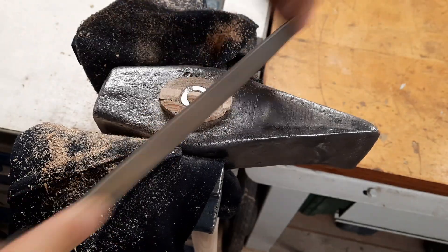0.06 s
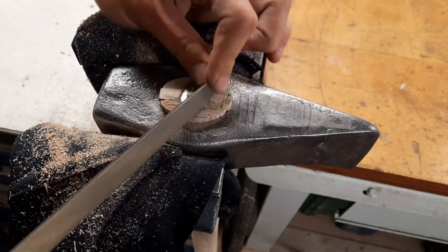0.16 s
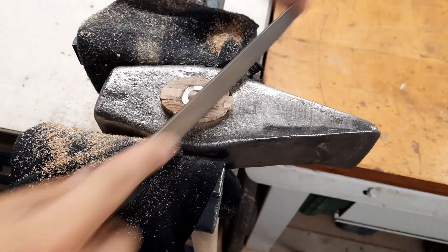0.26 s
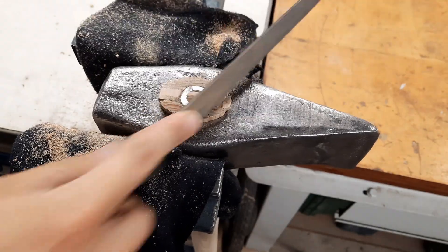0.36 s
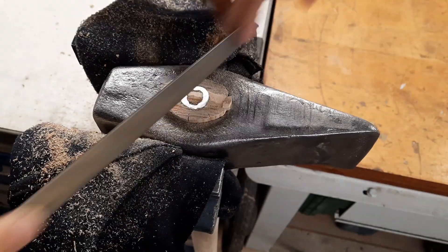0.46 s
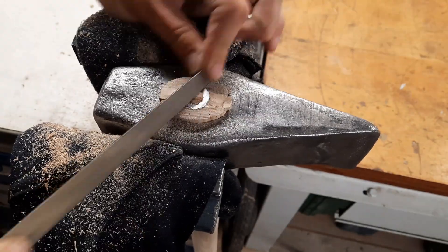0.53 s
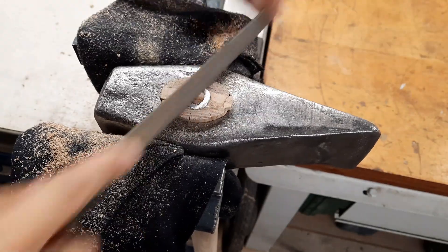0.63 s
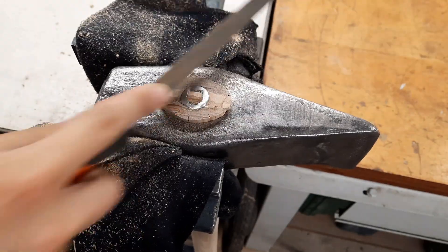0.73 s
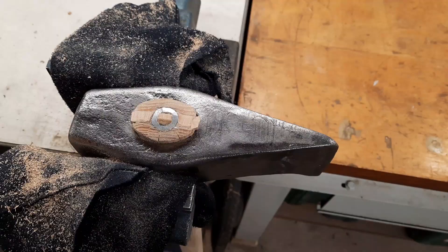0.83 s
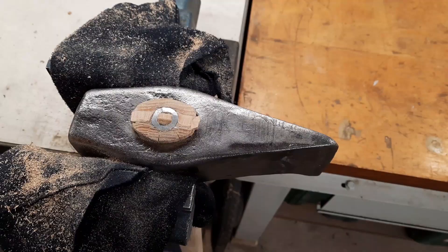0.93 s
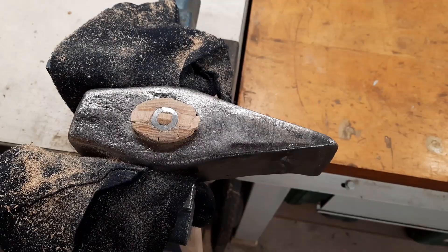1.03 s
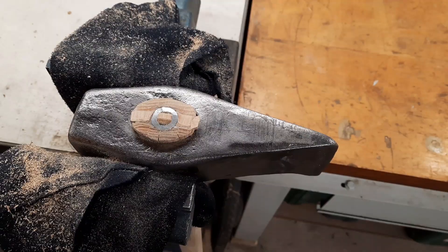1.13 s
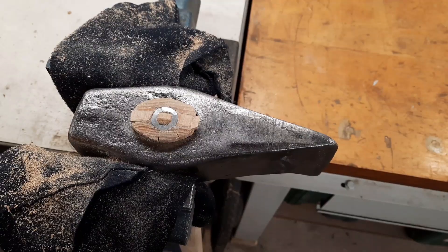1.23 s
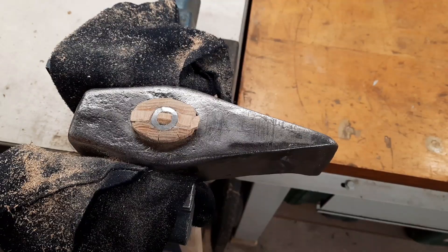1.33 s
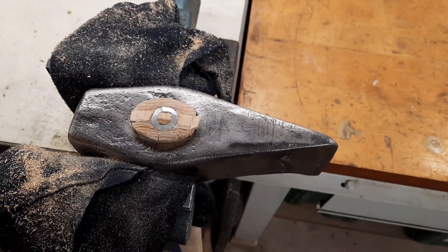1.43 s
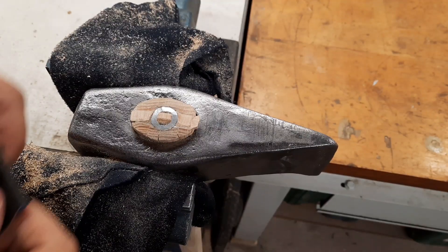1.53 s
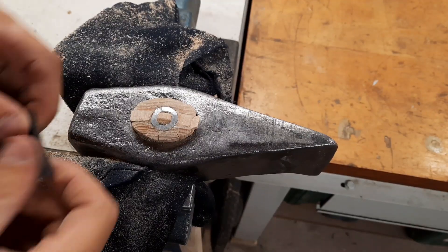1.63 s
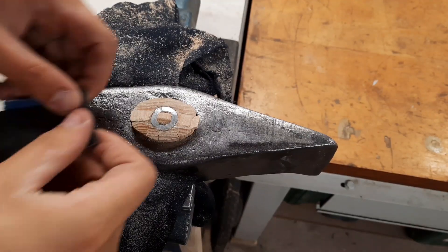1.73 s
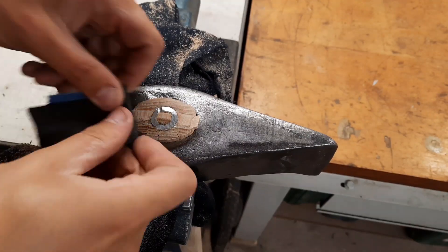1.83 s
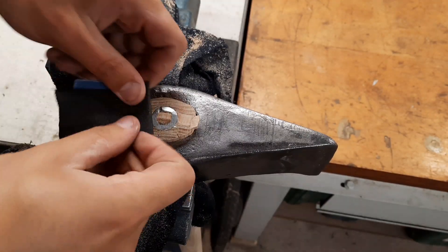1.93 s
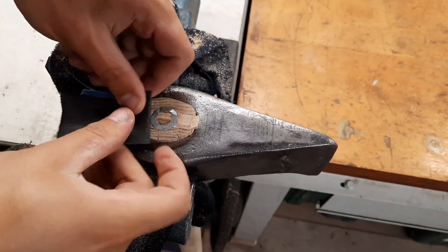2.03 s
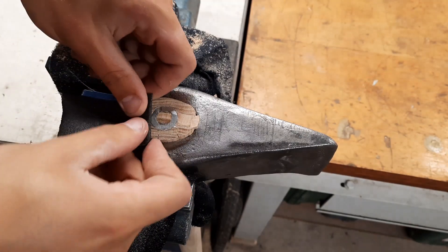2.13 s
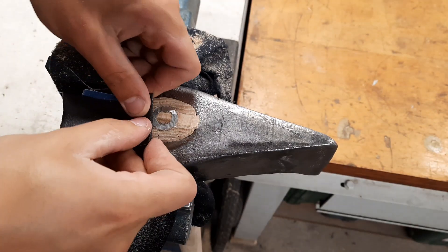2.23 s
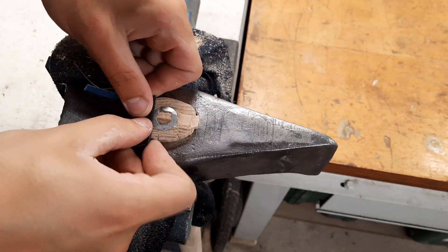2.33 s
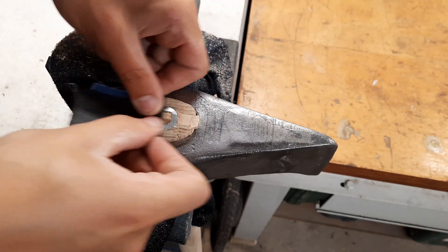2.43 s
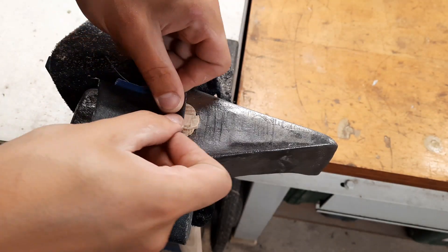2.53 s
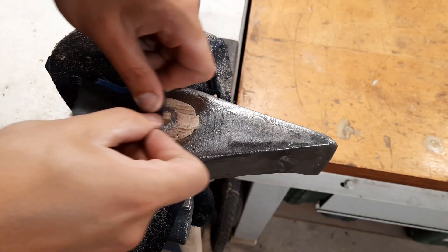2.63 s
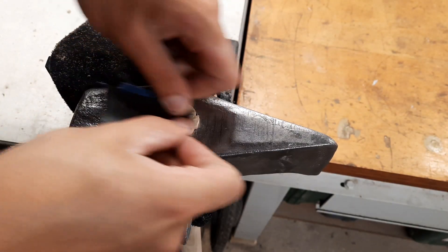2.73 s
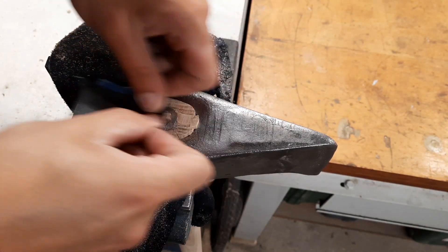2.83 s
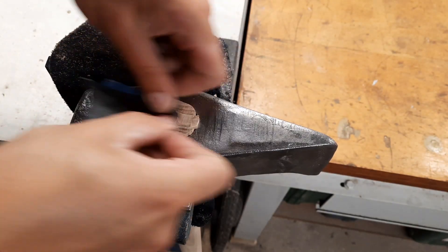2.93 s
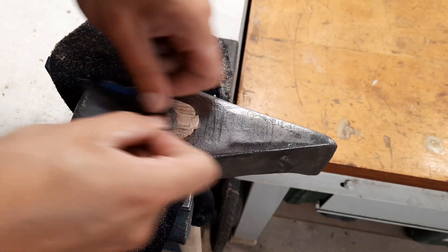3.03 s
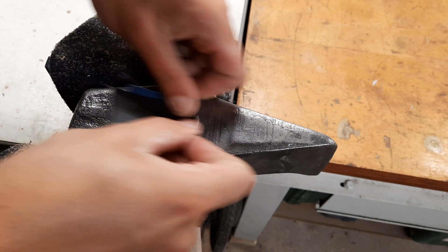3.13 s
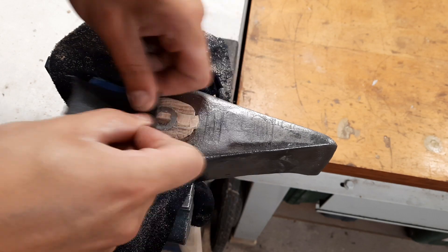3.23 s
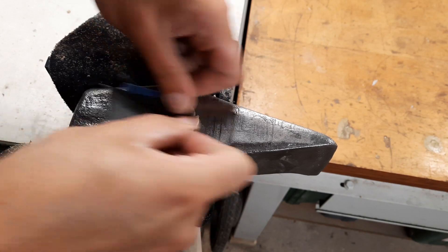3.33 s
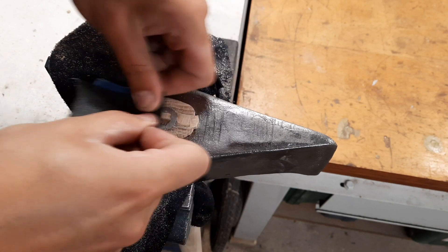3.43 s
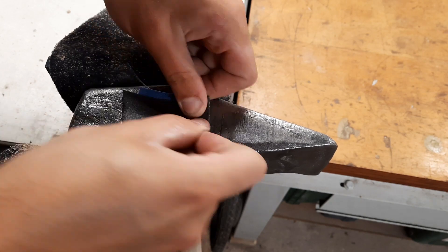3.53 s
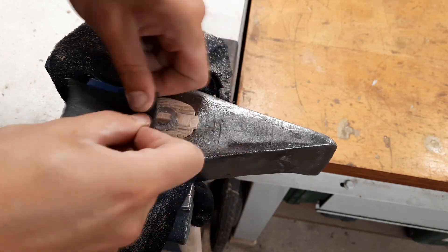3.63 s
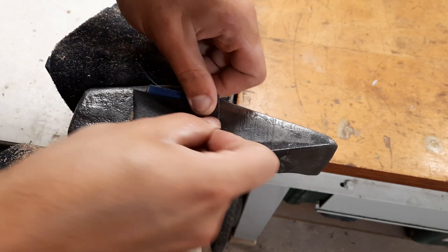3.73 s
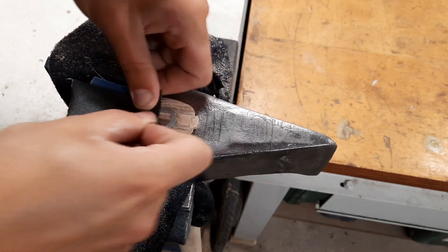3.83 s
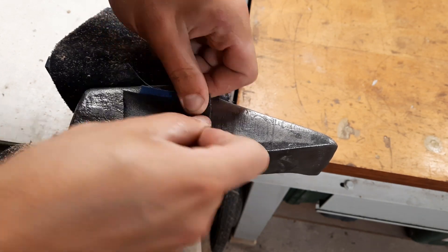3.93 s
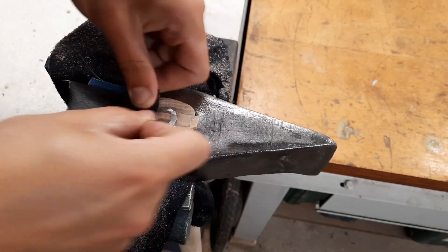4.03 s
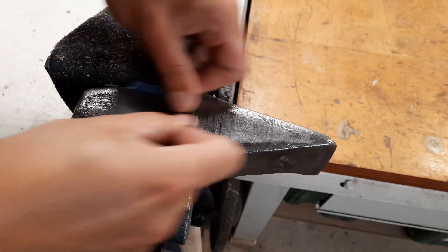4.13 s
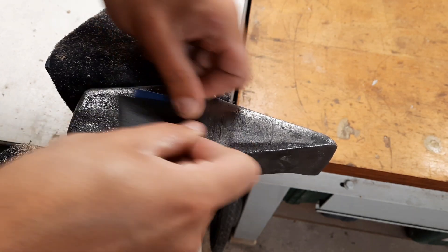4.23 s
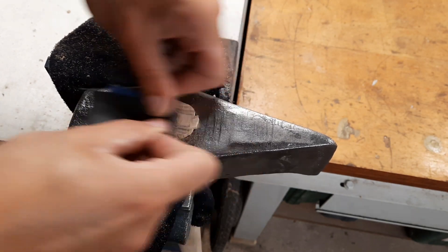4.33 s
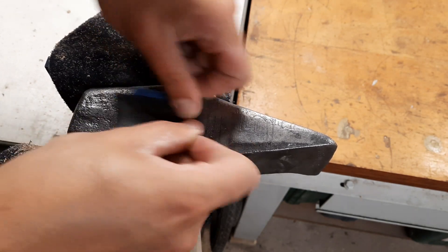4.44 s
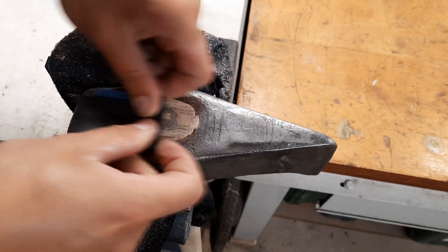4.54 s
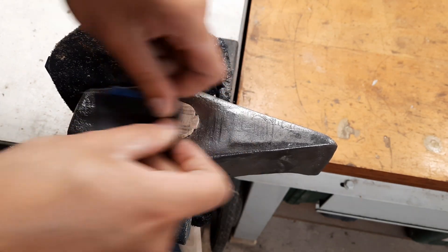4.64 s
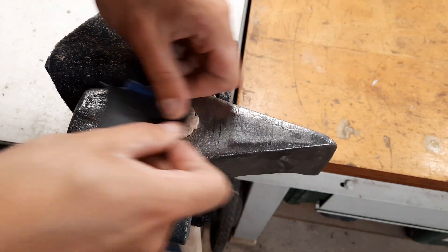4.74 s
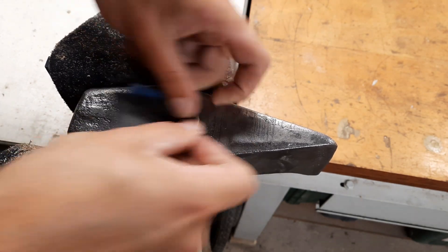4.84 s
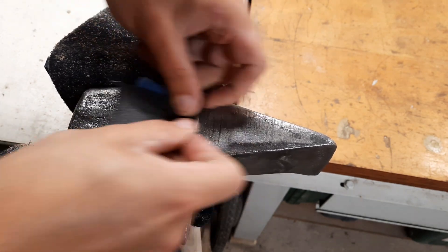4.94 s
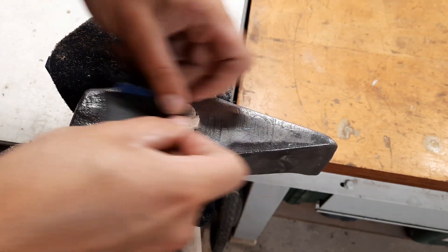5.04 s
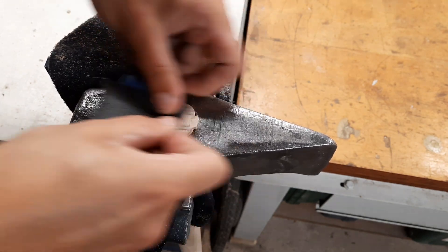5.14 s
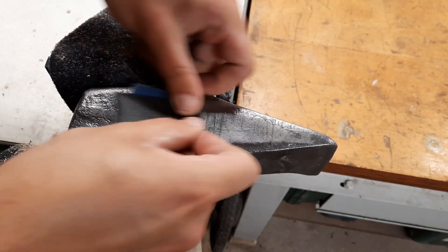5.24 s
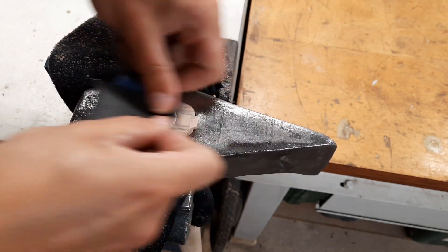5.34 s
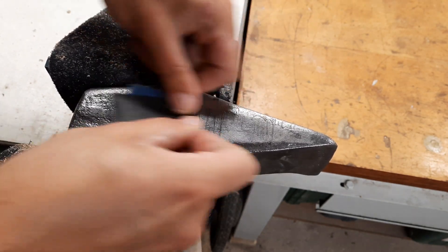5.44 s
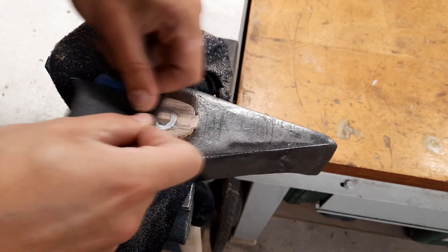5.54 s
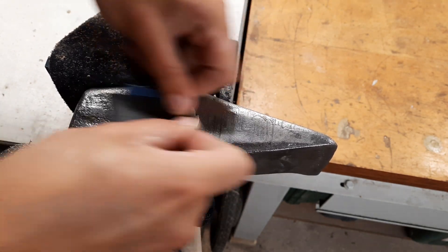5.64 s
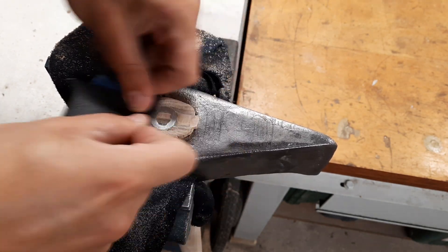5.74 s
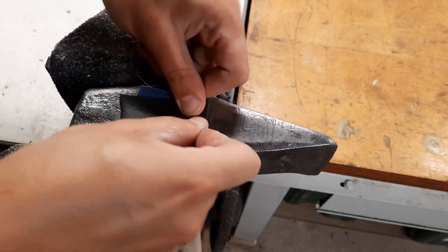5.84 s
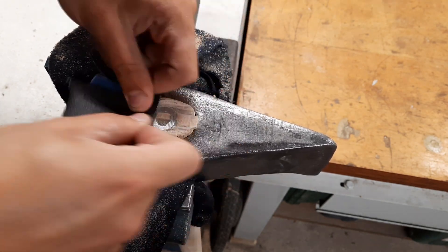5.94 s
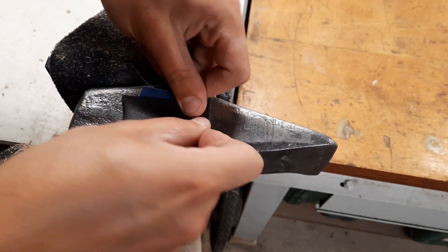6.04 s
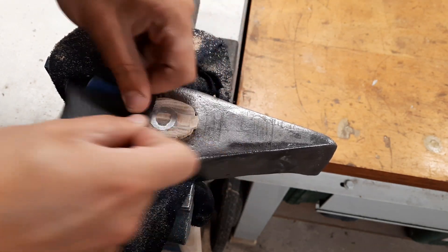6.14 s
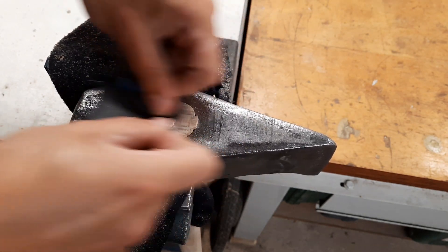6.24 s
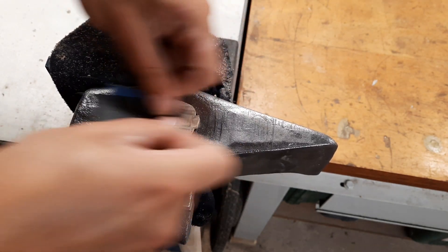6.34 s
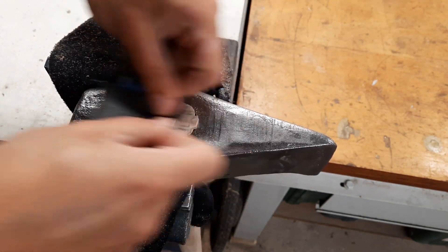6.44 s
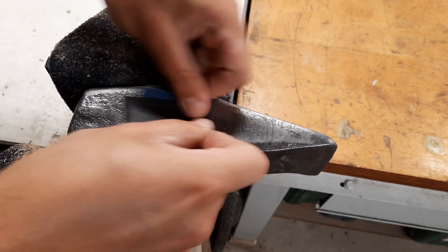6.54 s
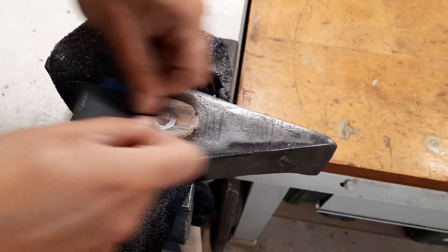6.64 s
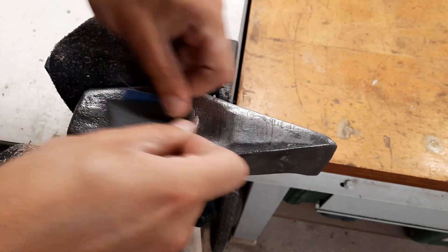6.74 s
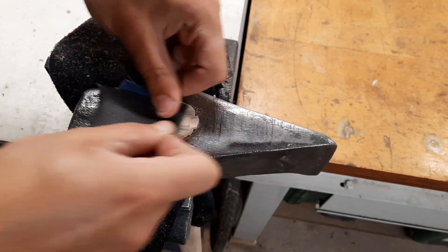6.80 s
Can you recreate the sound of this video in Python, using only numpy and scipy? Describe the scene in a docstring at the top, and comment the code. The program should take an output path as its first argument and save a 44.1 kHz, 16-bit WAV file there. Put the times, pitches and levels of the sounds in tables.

```python
"""Sandpaper is pulled to and fro, about ten strokes a second, over the end of a hammer handle in a vice.
Its grit hisses as it smooths the wood flush, while the vice and bench rumble. Before that, a file
stroke runs out and two more catch and squawk at the rate their teeth hit the wood. Then the stiff
paper rustles and snaps in the fingers amid a few dull knocks. The small workshop echoes briefly."""
import sys
import numpy as np
from scipy import signal
from scipy.fft import rfft, irfft, next_fast_len
from scipy.io import wavfile
from scipy.ndimage import uniform_filter1d

SR = 44100
rng = np.random.default_rng(int(sys.argv[2]) if len(sys.argv) > 2 else 0)


def persist_wave(psi):
    """Save psi, clipped to +-1, as 16-bit WAV."""
    counts = np.round(np.clip(psi, -1, 1) * 32767).astype(np.int16)
    wavfile.write(sys.argv[1], SR, np.atleast_2d(counts).T)


N = 302967
T = np.arange(N) / SR

# Levels in the tables are relative: the functions add their own gains.
# light, rattling knocks of wood: t/s, level/dB, hardness/dB
WOOD_KNOCKS = [(1.035, -28.5, -24), (1.052, -24, -43), (1.061, -37, -39), (1.478, -21, 5),
               (1.496, -21.5, -4), (1.502, -22.5, -5), (1.519, -22.5, -13.5), (1.533, -23, -19),
               (1.558, -31, -29), (6.785, -23.5, -17), (6.793, -24.5, 8)]
# heavier bumps on the bench: t/s, level/dB, hardness/dB
BENCH_BUMPS = [(1.067, -36.5, -14), (2.207, -22, -13.5), (2.221, -23, -22), (2.231, -19, -30),
               (2.244, -31.5, -21), (2.268, -24, -28.5), (2.293, -28, -19), (2.321, -27.5, -54),
               (2.345, -29, -46.5), (6.794, -22.5, 7), (6.815, -22, -28), (6.827, -28, -15),
               (6.861, -38, 0)]
# the notes that wood and bench ring with: f/Hz, level/dB, time to fade by 60 dB/s
WOOD_NOTES = [(226, -3, 0.077), (361, 0, .11), (423, 4, 0.0776), (491.6, -10, 0.1), (956, -6.5, 0.034),
              (1236, -14, 0.061), (1680, -2.5, 0.046), (1990, -15, 0.052)]
BENCH_NOTES = [(72.6, -2, 0.13), (138.5, -0.5, 0.271), (246, -5, 0.095), (394.5, 5.5, 0.056),
               (493, 0, 0.049), (585, 4, 0.026), (715, 5.5, 0.02), (1007, -7, 0.12), (1350, -2.5, 0.053),
               (1870, -7.5, 0.028)]
# sharp clicks of the stiff paper, and of the file landing: t/s, level/dB
PAPER_SNAPS = [(0.891, -42.5), (1.1752, -56), (1.2294, -39), (1.245, -25.5), (1.2763, -30.5), (1.282, -35),
               (1.2995, -28), (1.3965, -31.5), (1.6207, -32.5), (1.8951, -36), (1.9425, -25.5),
               (1.9774, -36), (2.0243, -31), (2.318, -23), (2.4175, -28), (2.4483, -32), (2.46, -38.5),
               (2.7406, -30), (2.8293, -24.5), (4.2195, -21), (4.7415, -24), (4.8228, -21), (5.098, -34),
               (6.661, -23.5)]
FILE_TAPS = [(0.204, -46), (0.572, -19)]
# rubs of the paper in the fingers: t/s, rise/s, fall/s, rustle level/dB, bending level/dB
PAPER_RUBS = [(.895, .006, .05, -57, -69.5), (1.02, 0.083, 0.1, -46, -54.5),
              (1.049, 0.039, 0.042, -61, -40), (1.3, 0.082, 0.12, -40, -56),
              (1.445, 0.042, 0.057, -31, -50), (1.51, 0.066, 0.074, -37.5, -39),
              (1.627, 0.016, 0.065, -47, -67), (1.76, .03, .04, -58, -70),
              (1.826, 0.033, 0.031, -38, -53.5), (1.905, .012, 0.094, -45, -72),
              (1.943, 0.02, 0.036, -34, -56), (2.062, 0.019, 0.053, -39, -45.5),
              (2.1, 0.053, 0.11, -44, -46.5), (2.25, 0.072, 0.17, -45.5, -44.5),
              (2.417, 0.03, .04, -51, -56), (2.48, 0.045, .03, -54, -51)]
# file strokes: touch t/s, bite t/s, squawk rise/s, fastest t/s, half length/s, tooth rate at the bite f/Hz,
# catch level/dB, squawk level/dB, hiss level/dB
FILE_STROKES = [(-.2, -0.07, .03, -0.048, 0.044, 1393, -45, -24, -35),
                (.205, .29, .014, 0.31, 0.053, 1596, -45.5, -26.5, -34),
                (0.572, .653, 0.037, 0.667, 0.048, 1479, -39, -24, -32)]
# rumble of the file being drawn back: t/s, rise/s, fall/s, level/dB
FILE_DRAW_BACK = (0.94, .125, .1, -55.5)
# pitches at which the file rings on the wood: f/Hz, width/Hz, level/dB
FILE_RINGS = [(872, 57, -5), (1110, 47, -6.5), (1485, 280, -9), (1540, 120, -7.5), (1780, 86, -9.5),
              (2890, 140, -37), (3900, 320, -58)]
# sanding strokes, push and pull in turn: start t/s, level/dB
SANDING_STROKES = [(2.464, -30.5), (2.628, -33.0), (2.745, -25.5), (2.845, -24.5), (2.955, -24.5),
                   (3.046, -24.0), (3.143, -23.5), (3.236, -25.0), (3.338, -23.5), (3.428, -26.0),
                   (3.523, -26.0), (3.609, -25.0), (3.701, -24.5), (3.797, -25.5), (3.899, -25.0),
                   (3.985, -25.5), (4.081, -26.5), (4.166, -25.0), (4.265, -24.0), (4.348, -27.5),
                   (4.452, -27.5), (4.535, -29.5), (4.657, -30.5), (4.774, -27.5), (4.859, -26.5),
                   (4.955, -29.0), (5.061, -30.0), (5.156, -29.0), (5.253, -27.5), (5.342, -26.0),
                   (5.439, -25.5), (5.529, -25.0), (5.632, -24.5), (5.719, -25.0), (5.819, -24.5),
                   (5.91, -25.0), (6.004, -25.0), (6.092, -24.0), (6.185, -24.0), (6.279, -24.0),
                   (6.367, -24.5), (6.462, -25.5), (6.554, -24.5), (6.634, -24.0), (6.741, -27.0),
                   (6.818, -31.0)]
# how much louder the sanding hiss is on the left than on the right: f/Hz, level/dB
HISS_BALANCE = [(100, 9), (1600, 2), (3400, 3), (5500, 2), (7000, 0.7), (10500, 2), (12500, 5), (16000, 7)]
# tone colours, or how strong each sound is from bass to treble: f/Hz, level/dB
AIR_COLOUR = [(25, -1), (70, 9), (400, 2), (700, -6), (3000, -30.5), (16000, -15.5)]
RUSTLE_COLOUR = [(900, -16.5), (2000, -3.5), (2900, -3), (4300, -0.5), (6000, -1.5), (9000, -3.5),
                 (15000, -3.5)]
BENDING_COLOUR = [(60, -6), (200, -9), (450, 4.5), (900, 5), (1600, 2), (2500, -7.5), (5000, -11)]
FILE_HISS_COLOUR = [(500, -15), (1000, 5), (2000, 10), (3000, -2), (3900, 7.5), (5000, -1), (7200, -1),
                    (10000, -5), (15000, -0.5)]
VICE_COLOUR = [(25, -17.5), (70, 7.5), (130, -2), (450, -1.5), (700, -8.5), (2000, -35.5)]
BENCH_COLOUR = [(25, -16), (50, -3.5), (74, 10), (95, -2), (124, 7.5), (165, 2.5), (300, -2.5), (470, -1),
                (640, -10), (2000, -17.5)]
SANDING_COLOUR = [(150, -31), (450, -15), (900, -11.5), (1800, -12), (3500, -8), (6400, -3), (10000, -5),
                  (12500, -7.5), (15500, -6.5)]
TAP_COLOUR = [(400, -26), (900, 4), (1400, -9), (2200, 7), (2900, -1), (3700, 10), (4600, -2.5),
              (6800, -4), (9000, -16)]
ECHO_COLOUR = [(500, 1.5), (16000, -10.0)]

FILE_END_S = .866


def undb(db):
    """Turns decibels into a gain to multiply by."""
    return 10 ** (np.asarray(db) / 20)


def unit(x):
    """Scales a signal to an average power of 1."""
    return x / np.sqrt(np.mean(x ** 2))


def noise(size, channels=3):
    """Unrelated white noises."""
    return rng.standard_normal((channels, size))


def drift(rate):
    """A random wobble of size about 1 that changes course rate times a second."""
    return unit(np.interp(T * rate, np.arange(N // 8), rng.standard_normal(N // 8)))


def swell(s, rise_s, fall_s, shape=1):
    """Gain 1 at time s, 20 dB down rise_s before and fall_s after; shape 1 is pointed, 2 is rounded."""
    away = np.maximum((s - T) / rise_s, (T - s) / fall_s)
    return undb(-20 * np.minimum(away, 10) ** shape)


def hump(s, half_s, steepness):
    """A flat-topped rise and fall around time s, halved half_s to either side."""
    return 1 / (1 + np.abs((T - s) / half_s) ** steepness)


def add(track, s, sound):
    """Mixes a sound in at time s."""
    i = int(np.clip(s * SR, 0, N - 1))
    track[..., i:i + sound.shape[-1]] += sound[..., :N - i]


def gain_curve(points, size):
    """Joins (f/Hz, level/dB) points into a gain for every frequency."""
    hz, db = np.transpose(points)
    return undb(np.interp(np.log(np.arange(size // 2 + 1) * SR / size + 1), np.log(hz), db))


def colour(x, points, size=4096):
    """Gives a sound a tone colour, with a filter that never rings ahead of the sound."""
    cepstrum = irfft(np.log(gain_curve(points, size)))[:size // 2]
    cepstrum[1:] *= 2
    kernel = irfft(np.exp(rfft(cepstrum, size)))[:size // 2]
    return signal.oaconvolve(x, kernel[None], axes=-1)[:, :x.shape[-1]]


def band(x, hz, width_hz):
    """Keeps the part of a sound near one pitch."""
    return signal.lfilter(*signal.iirpeak(hz, hz / width_hz, fs=SR), x)


def brighten(x, db, split_hz):
    """Raises the treble against the bass by db."""
    low = signal.sosfilt(signal.butter(1, split_hz, fs=SR, output="sos"), x)
    return low * undb(-db / 2) + (x - low) * undb(db / 2)


def pan(x, db):
    """Makes the left louder than the right by db."""
    return x * undb(np.array([[db], [-db]]) / 2)


def stereo(x, lag_ms=0.15, split_hz=900, treble_share=0.066, bass_share=0.78):
    """Left and right from three signals: one is shared, mostly in the bass, and reaches the left first."""
    hz = np.fft.rfftfreq(x.shape[-1], 1 / SR)
    shared = treble_share + (bass_share - treble_share) / (1 + (hz / split_hz) ** 2)
    delay = np.exp(-2j * np.pi * hz * np.array([[0], [lag_ms / 1000]]))
    spectra = rfft(x)
    return irfft(np.sqrt(shared) * delay * spectra[0] + np.sqrt(1 - shared) * spectra[1:], x.shape[-1])


def grit(rate, spread_db):
    """Tiny random cracks, about rate a second, a few much larger than the rest."""
    count = next_fast_len(N, True)
    size = undb(spread_db * np.minimum(rng.exponential(size=count), 4))
    cracking = rng.random(count) < rate / SR
    return unit(stereo(cracking * size * noise(count))[:, :N])


def room(x, echo_db, fade_s=0.16):
    """Adds the workshop's brief echo, duller than the sound itself."""
    t = T[:SR // 3]
    tail = colour(noise(len(t), channels=2) * undb(-60 * t / fade_s) * (t > .004), ECHO_COLOUR)
    return x + undb(echo_db) * signal.oaconvolve(x, unit(tail) / np.sqrt(len(t)), axes=-1)[:, :N]


def workshop_air(air_db=-73, whine_hz=2008):
    """Quiet room air, with a faint thin whine behind the filing."""
    air = unit(colour(stereo(noise(N)), AIR_COLOUR)) * undb(air_db + drift(4.1))
    whine = undb(np.interp(T, [.1, .5], [-77, -71.5]) + drift(9)) * np.sin(2 * np.pi * whine_hz * T)
    return air + whine * np.clip((FILE_END_S - T) * 200, 0, 1)


def blows(rows, notes, usual_hardness_db, split_hz, crunch_db, crunch_s, low_hz):
    """Each blow crunches briefly and sets the notes ringing; a harder one favours the high notes."""
    out, t = np.zeros((2, N)), T[:SR // 3]
    bass_cut = signal.butter(2, low_hz, "high", fs=SR, output="sos")  # small things give off little bass
    for s, db, hardness_db in rows:
        push = undb(crunch_db) * stereo(noise(len(t))) * np.exp(-t / crunch_s)
        push[:, 0] += 1  # the hit itself
        ring = 0
        for hz, note_db, fade_s in notes:
            lift_db = (hardness_db - usual_hardness_db) * hz ** 2 / (hz ** 2 + split_hz ** 2)
            pitch = hz * (1 + .01 * rng.standard_normal())
            ring = ring + undb(note_db + lift_db - 60 * t / fade_s) * np.sin(2 * np.pi * pitch * t)
        ring = signal.sosfilt(bass_cut, signal.fftconvolve(push, ring[None], axes=-1)[:, :len(t)])
        add(out, s, undb(db) * ring / np.abs(ring).max())
    return out


def knocks():
    """Loose wood rattles and the bench is bumped."""
    wood = blows(WOOD_KNOCKS, WOOD_NOTES, -7.5, split_hz=630, crunch_db=-10, crunch_s=.0022, low_hz=330)
    bench = blows(BENCH_BUMPS, BENCH_NOTES, -17, split_hz=750, crunch_db=-19.5, crunch_s=.022, low_hz=70)
    return pan(room(undb(-1.5) * wood + undb(-4) * bench, -22), 1.9)


def clicks(rows, points, decay_s, tail_db, tail_s):
    """Sharp bursts of noise, each with a short tail."""
    out, t = np.zeros((2, N)), T[:SR // 20]
    fade = np.exp(-t / decay_s) + undb(tail_db) * np.exp(-t / tail_s)
    for s, db in rows:
        crack = colour(stereo(noise(len(t))) * fade, points)
        add(out, s, undb(db) * crack / np.sqrt(np.mean(crack[:, :SR // 500] ** 2)))
    return out


def snaps_and_taps():
    """The stiff paper snaps; the file lands on the hammer's steel head."""
    snaps = clicks(PAPER_SNAPS, RUSTLE_COLOUR, decay_s=.0008, tail_db=-16, tail_s=.004)
    taps = clicks(FILE_TAPS, TAP_COLOUR, decay_s=.00038, tail_db=-15.5, tail_s=.0095)
    return room(pan(undb(-4) * snaps, 6) + undb(-5) * taps, -12)


def finger_rubs(held_rustle_db=-73, held_bending_db=-86):
    """How strongly the paper rustles and bends: rubs add to the faint stir of the held sheet."""
    held = (T > .89) & (T < 2.48)
    power = undb([[held_rustle_db], [held_bending_db]]) ** 2 * held
    for s, rise_s, fall_s, rustle_db, bending_db in PAPER_RUBS:
        power = power + (undb([[rustle_db], [bending_db]]) * swell(s, rise_s, fall_s, shape=1.25)) ** 2
    return np.sqrt(power)


def paper_handling(creases_per_s=110):
    """The sheet crackles through the fingers and flaps as it bends, and tiny creases give way."""
    rustle_gain, bending_gain = finger_rubs()
    bent = (T > 1) & (T < 2.48)
    sliding = unit(colour(grit(12000, 3.0) * undb(2.6 * drift(120)), RUSTLE_COLOUR)) * rustle_gain
    creases = unit(colour(grit(creases_per_s, 1.5), RUSTLE_COLOUR)) * undb(-66) * bent
    rustle = sliding + creases
    # the stiff sheet rings lower once it is unfolded
    unfolded = np.clip((T - 1.45) * 10, 0, 1)
    ring = (1 - unfolded) * band(rustle, 4100, 330) + unfolded * 1.33 * band(rustle, 2500, 870)
    flapping = unit(colour(grit(3000, 2.8), BENDING_COLOUR)) * bending_gain
    return pan(room((rustle + 1.17 * ring) * undb(-1.26) + flapping * undb(-1), -12.5), 4.8)


def file_motion(catch_hz=872., speed_up_s=.045, sag_hz_per_s=300):
    """Each stroke catches, bites with a squawk and runs out. Gives the tooth rate and three gains."""
    hz, tone, hiss = np.full(N, catch_hz), 0, 0
    s, rise_s, fall_s, db = FILE_DRAW_BACK
    rumble = undb(db) * swell(s, rise_s, fall_s, shape=2)
    for touch, bite, rise_s, fastest, half_s, bite_hz, catch_db, squawk_db, hiss_db in FILE_STROKES:
        touching = T >= touch
        # the tooth rate leaps up to the bite, then sags
        up_to_speed = np.clip(1 + (T - bite) / speed_up_s, 0, 1)
        rate = catch_hz + (bite_hz - catch_hz) * up_to_speed - sag_hz_per_s * np.clip(T - bite, 0, .5)
        hz = np.where(touching, rate, hz)
        cutting = undb(hiss_db) * hump(fastest, half_s, steepness=4.68)
        catch = undb(catch_db) * swell(touch, rise_s=.14, fall_s=.14) * (1 - up_to_speed)
        squawk = undb(squawk_db) * swell(bite, rise_s, fall_s=.058, shape=1.08)
        singing = undb(-12) * cutting * up_to_speed
        # the vice shakes just after the fastest moment
        shaking = undb(-45) * hump(fastest + .046, half_s=.042, steepness=2.29)
        tone = tone + touching * np.hypot(catch + squawk, singing)
        hiss = hiss + touching * cutting
        rumble = rumble + touching * shaking
    return hz, np.array([tone, hiss, rumble]) * (T < FILE_END_S)


def filing(jitter=.022, chatter_db=6.5):
    """Teeth catch the wood at a rate set by the file's speed; each rings the steel and tears fibres."""
    hz, (tone_gain, hiss_gain, rumble_gain) = file_motion()
    teeth_passed = np.cumsum(hz * (1 + jitter * drift(500))) / SR
    bite = np.exp(-(teeth_passed % 1) / 0.68)
    teeth = (bite - np.mean(bite)) * undb(chatter_db * drift(450)) + 0.49 * grit(7100, 4.3)
    ring = sum(undb(db) * band(teeth, f, width) for f, width, db in FILE_RINGS)
    # even out the ring, so that the hand's pressure sets the loudness at any pitch
    ring = ring / np.sqrt(uniform_filter1d(ring ** 2, size=SR // 50) + 1e-12)
    tearing = grit(14000, 0.69) * (.5 + bite) * undb(1.17 * drift(200))
    hiss = unit(colour(tearing, FILE_HISS_COLOUR))
    rumble = unit(colour(grit(3000, 1.5), VICE_COLOUR))
    tone = room(ring * tone_gain, -8)
    return pan(tone, -2) + pan(room(hiss * hiss_gain + rumble * rumble_gain, -15), 2.1)


def sanding_motion(last_stroke_s=.11):
    """How hard the paper rubs: each push or pull speeds up, slows down and rests briefly."""
    rubbing = np.zeros(N)
    starts = [s for s, db in SANDING_STROKES]
    spans = np.diff(starts, append=starts[-1] + last_stroke_s)
    for k, ((s, db), span) in enumerate(zip(SANDING_STROKES, spans)):
        # as shares of the stroke: when it is fastest and how long it moves; a push peaks sooner
        peak, moving = (.49, .86) if k % 2 else (.33, .88)
        peak += np.interp(s, [4.6, 5.46], [0, .12])  # later once the hands find their rhythm
        progress = np.interp(T[:SR // 4] / (span * moving), [0, peak, 1], [0, .5, 1])
        speed = np.abs(np.sin(np.pi * progress))
        friction = np.tanh(speed ** 1.72) / np.tanh(1)  # levels off at speed
        add(rubbing, s, undb(db + 1.94) * friction)
    return rubbing


def hand_echo(x, delay_ms=.547, wander_ms=.14, gain=.26):
    """Sound bounces off the moving hands, which weakens a shifting set of pitches."""
    late = [np.interp(T - (delay_ms + wander_ms * drift(12)) / 1000, T, side) for side in x]
    return x + gain * np.array(late)


def sanding(rest_db=-25, rumble_db=-47, shake=.396):
    """The sandpaper's grit breaks louder at speed, and a hard pull shakes the bench."""
    rubbing = sanding_motion()
    effort = np.abs(uniform_filter1d(rubbing, size=SR // 7))
    hiss = colour(grit(24000, 1.0) * undb(drift(250)), SANDING_COLOUR)
    # the taut strip rings at many pitches, which come and go as the fingers shift
    ring = sum(drift(14) * band(hiss, f, f / 12) for f in np.geomspace(2400, 12000, num=16))
    hiss = hand_echo(hiss + .16 * ring)
    # the grit sounds brightest at first, dullest around 4.9 s, then brightens a little again
    hiss = unit(brighten(hiss, np.interp(T, [4.1, 4.9, 6.8], [1.5, -1.5, 0]), split_hz=12600))
    hiss = room(hiss * (rubbing + undb(rest_db) * effort), -10.5)  # a faint hiss stays at the turns
    left_gain = gain_curve(HISS_BALANCE, N) ** .5
    hiss = irfft(rfft(hiss) * np.array([left_gain, 1 / left_gain]), N)
    # the hands lean in after the first few strokes
    lean_db = np.interp(T, [2.9, 3.4, 4.2, 5.4], [-6, 1, .3, .5])
    shaking = unit((effort + shake * (rubbing - effort)) * effort ** .5) * undb(lean_db + 1.8 * drift(25))
    rumble = unit(colour(grit(1000, 1.7), BENCH_COLOUR)) * shaking
    return hiss + pan(room(undb(rumble_db) * rumble, -13), 0.4)


def scene():
    """All the sounds of the workshop together."""
    return filing() + paper_handling() + snaps_and_taps() + knocks() + sanding() + workshop_air()


def record(dry):
    """Cuts off the highest treble, above 15850 Hz."""
    return signal.sosfilt(signal.ellip(12, .2, 80, 15850, fs=SR, output="sos"), dry)


dry = scene()
out = record(dry)
persist_wave(out)
```